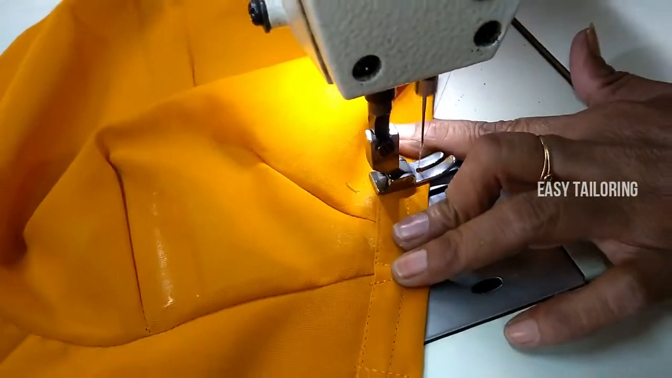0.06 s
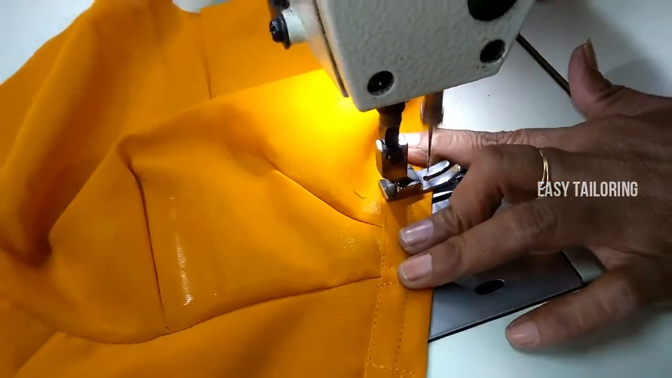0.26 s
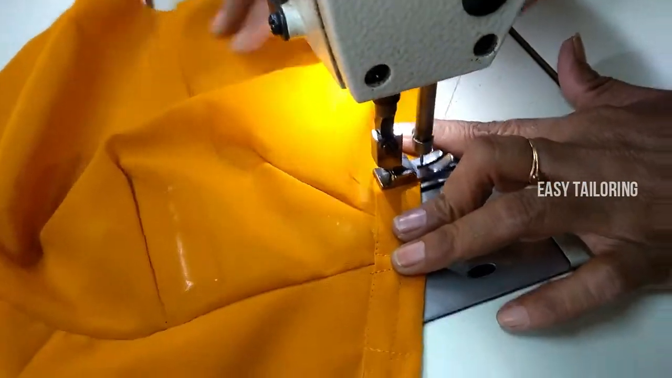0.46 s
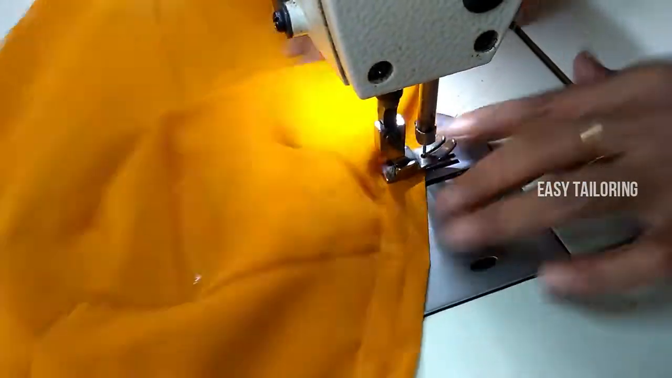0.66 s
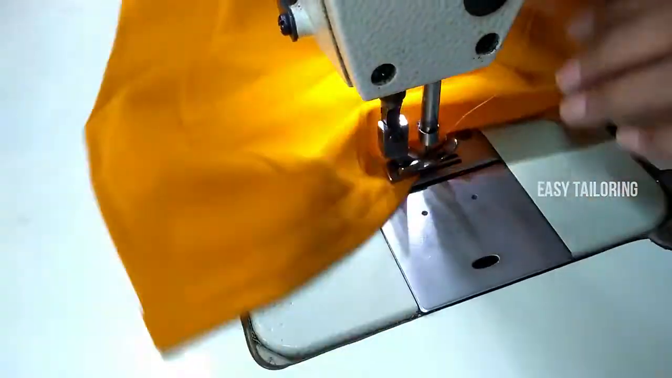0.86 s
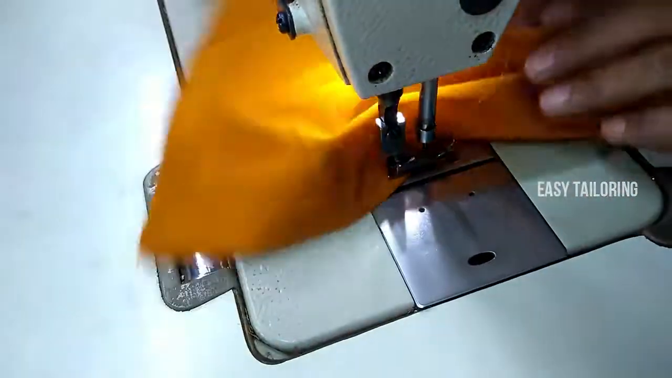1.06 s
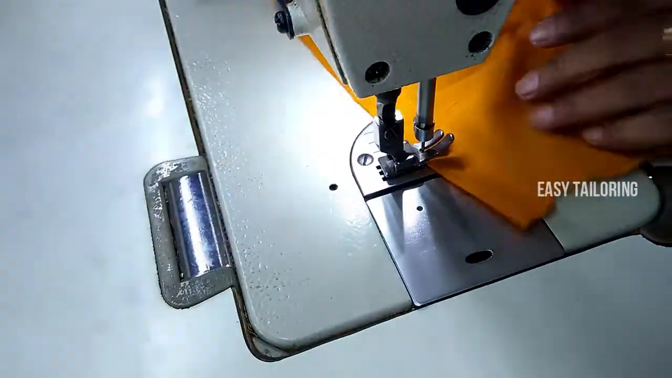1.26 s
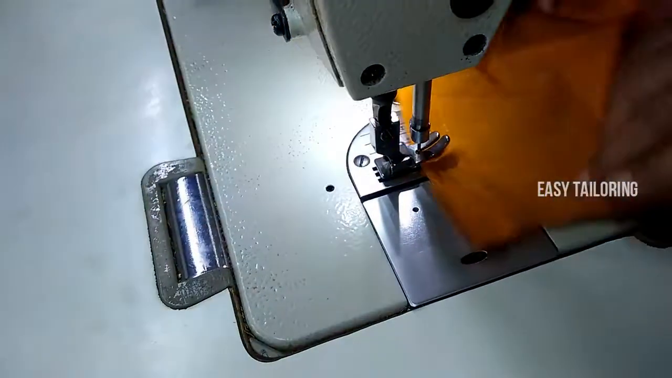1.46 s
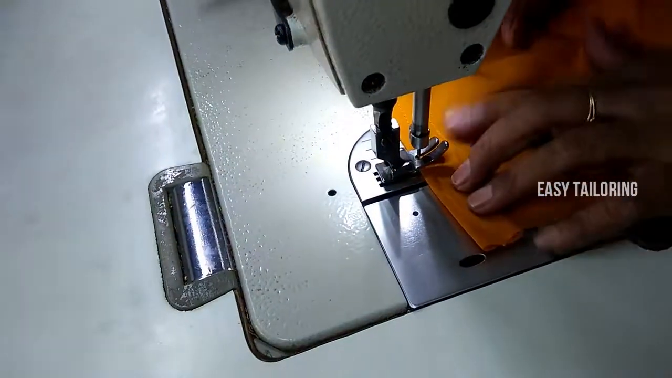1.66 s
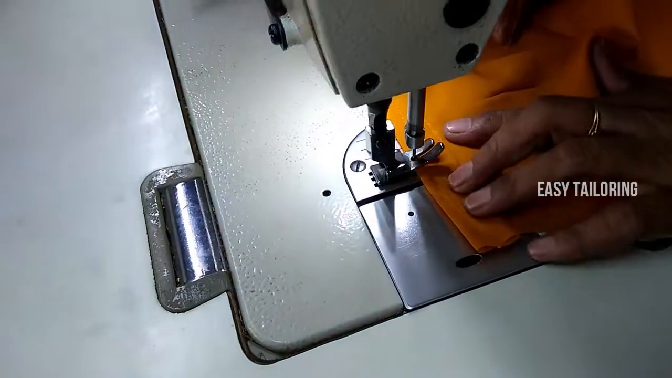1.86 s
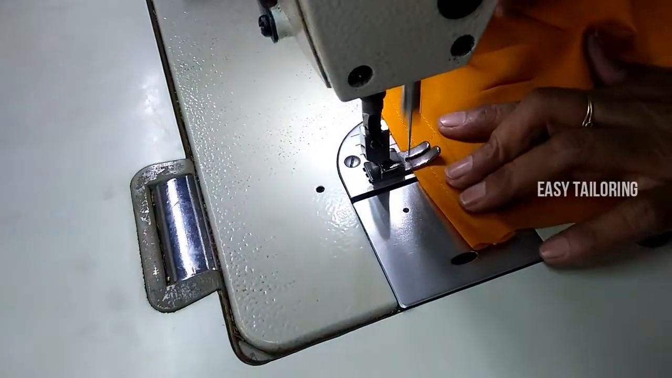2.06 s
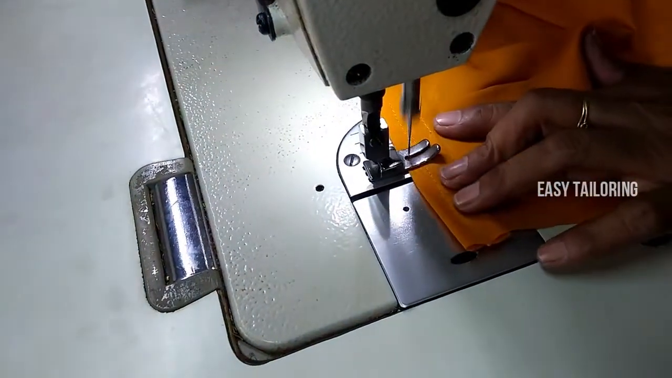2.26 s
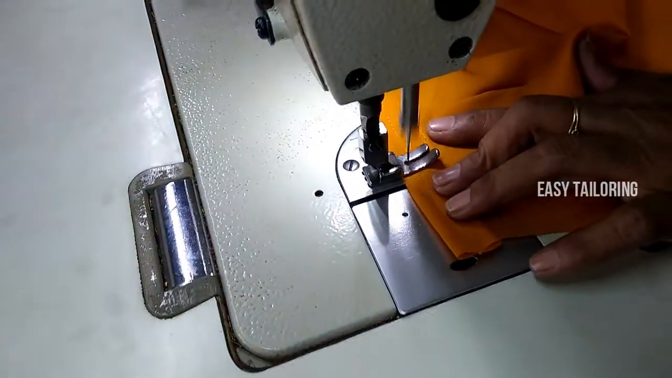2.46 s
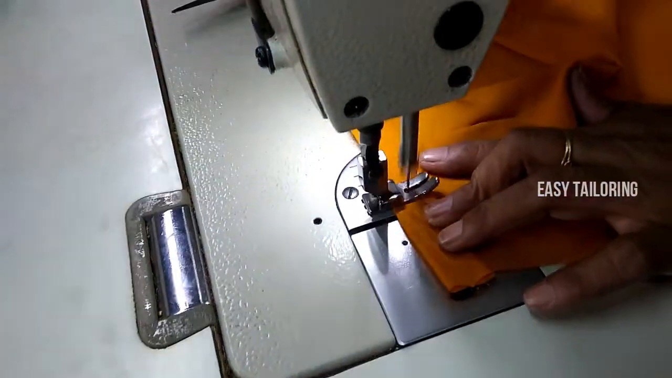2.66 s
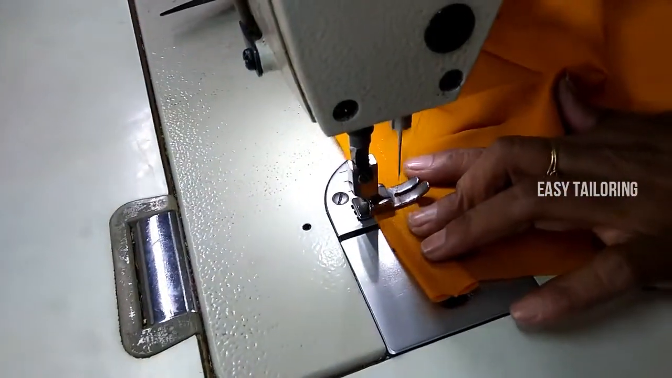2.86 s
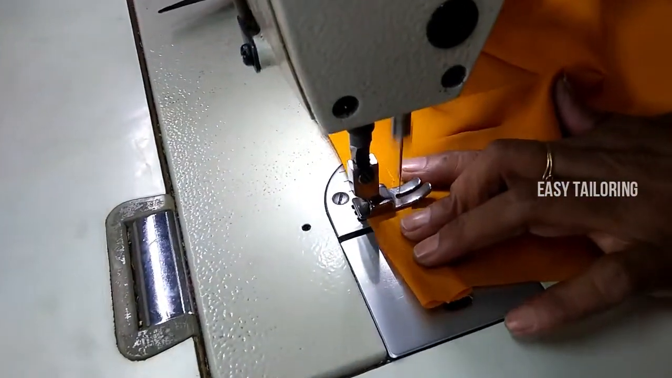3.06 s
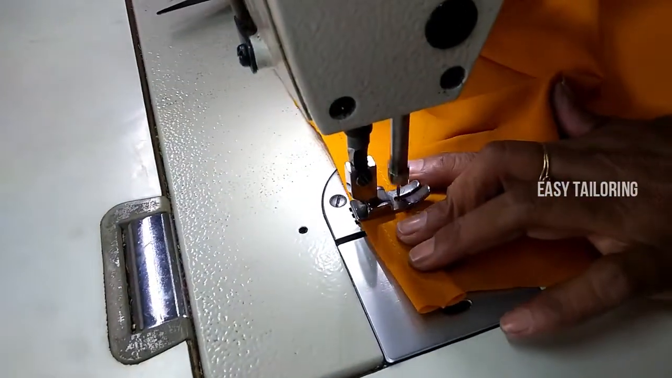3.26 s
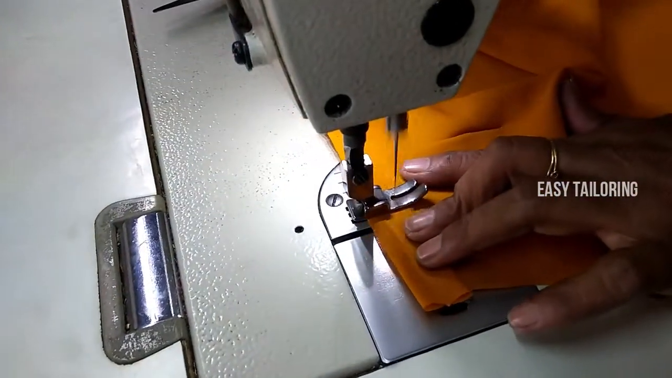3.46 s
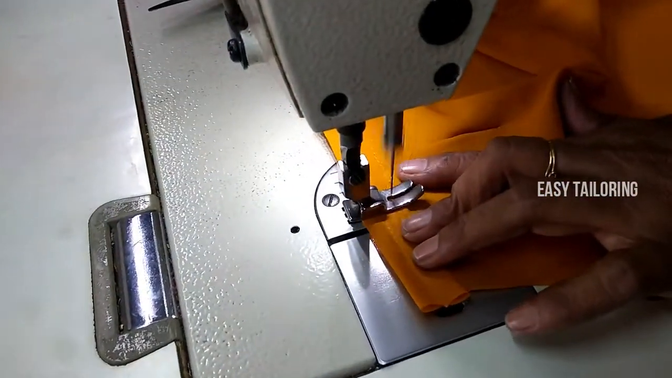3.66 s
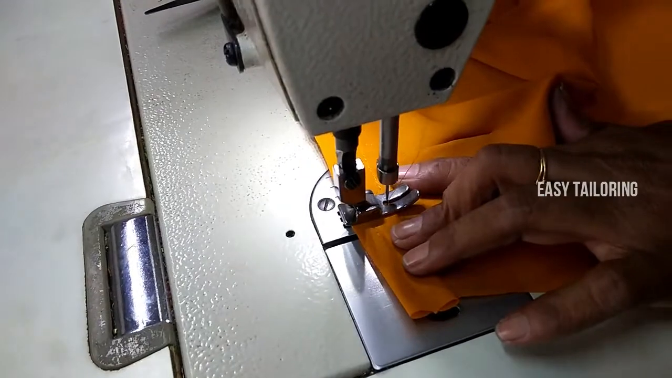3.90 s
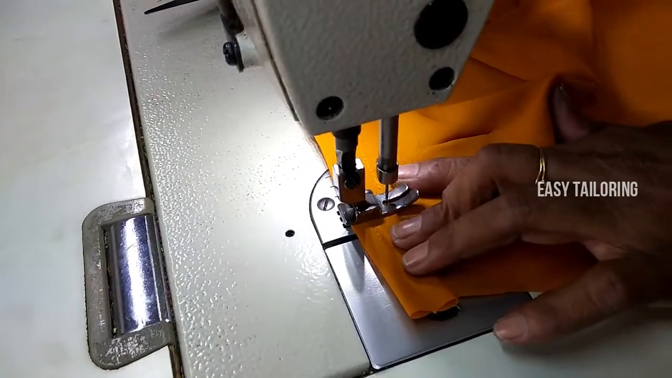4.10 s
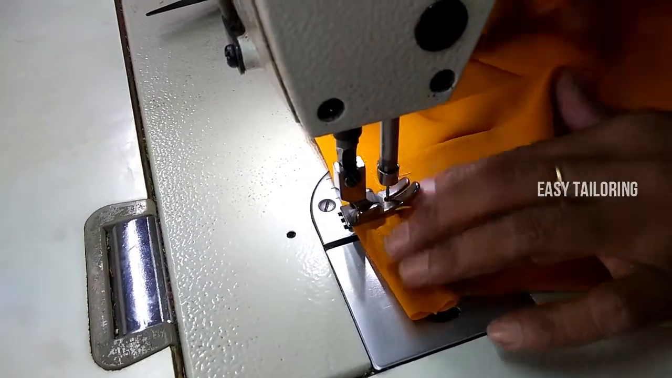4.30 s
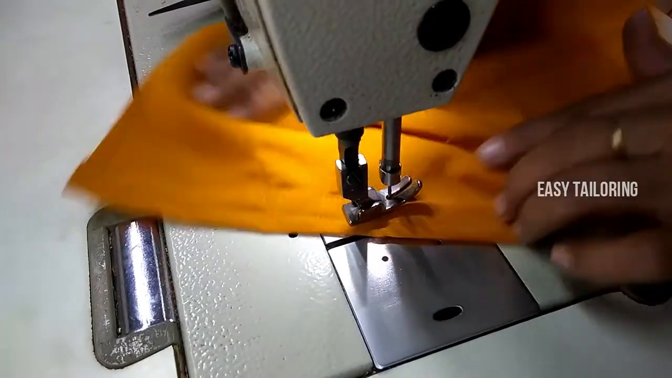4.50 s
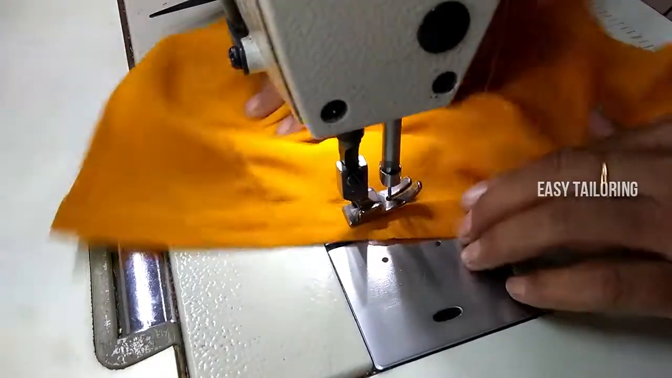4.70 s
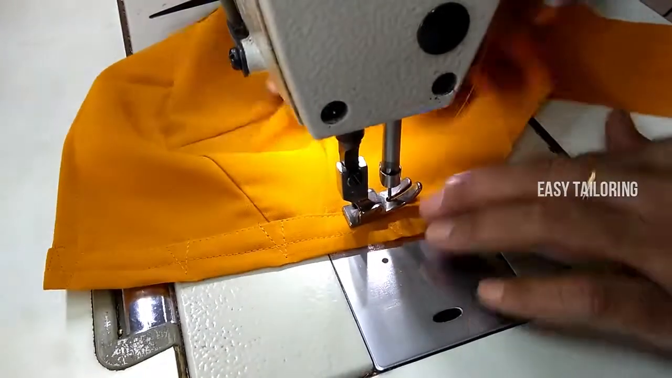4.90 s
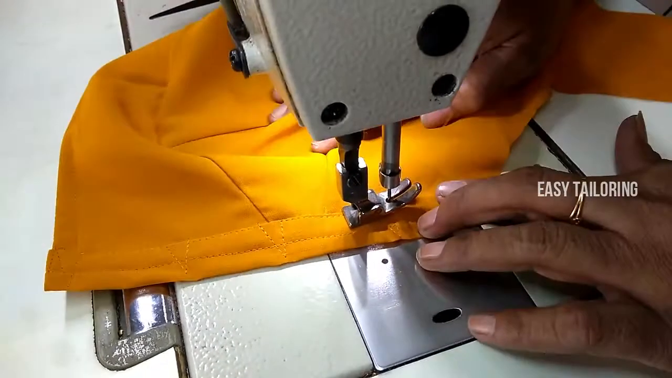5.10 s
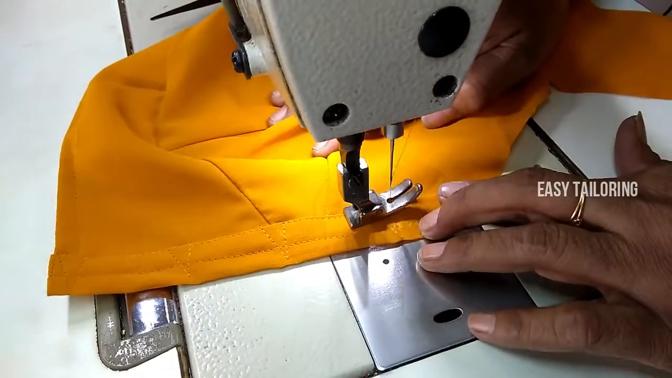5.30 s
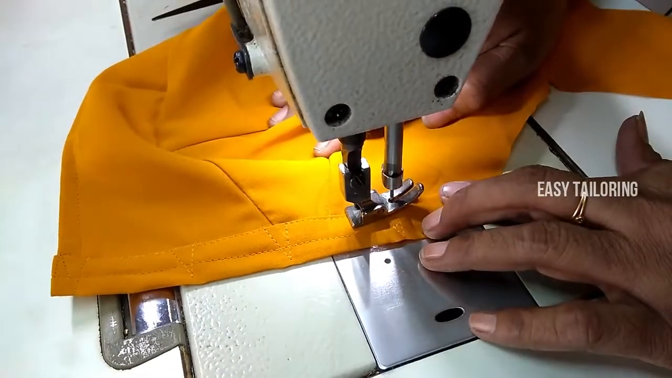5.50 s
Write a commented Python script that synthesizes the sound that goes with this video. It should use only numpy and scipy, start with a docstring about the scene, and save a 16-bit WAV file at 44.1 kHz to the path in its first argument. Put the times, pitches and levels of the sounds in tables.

```python
"""A few slow stitches of an industrial sewing machine close by, then hands turning the cloth. The presser foot is
raised and dropped, a run of eight stitches a second ends in a clatter and a clunk, and a last short burst follows.
Steel linkages rattle as streams of tiny impacts, gears whirr as narrow bands of noise, hard contacts tick, and
filtered noise makes the table boom and the cloth rub. The shaking table rocks the camera, which adds a low
rumble of opposite sign in the two channels."""
import sys
import numpy as np
from scipy import signal
from scipy.fft import rfft, irfft, next_fast_len
from scipy.io import wavfile
from scipy.ndimage import uniform_filter1d

SR = 44100
rng = np.random.default_rng(int(sys.argv[2]) if len(sys.argv) > 2 else 0)


def bounce(signal):
    """Save signal as a 16-bit WAV file at the path given by the first command-line argument."""
    frames = np.transpose(np.atleast_2d(signal))
    limited = np.clip(frames, -1, 1)
    pcm = np.round(limited * 32767).astype(np.int16)
    wavfile.write(sys.argv[1], SR, pcm)


N = 244474
TIME = np.arange(N) / SR


def amp(db):
    """Decibels to gain."""
    return 10 ** (np.asarray(db) / 20)


def evened(x):
    """Scales to rms 1."""
    return x / np.sqrt(np.mean(x ** 2))


def add(mix, s, sound):
    """Mixes a sound in at s seconds."""
    part = mix[max(round(s * SR), 0):][:len(sound)]
    part += sound[:len(part)]


def response(points, size=4096):
    """Impulse response of unit energy that starts at once and has the given colour."""
    hz, db = np.transpose(points)
    bins_hz = abs(np.fft.fftfreq(size, 1 / SR))
    log_gain = np.log(amp(np.interp(np.log(bins_hz + 1), np.log(hz), db)))
    # The Hilbert transform gives the phase that lets the energy arrive as early as possible.
    spectrum = np.exp(np.conj(signal.hilbert(log_gain)))
    taps = np.fft.ifft(spectrum).real[:size // 2]
    return taps / np.linalg.norm(taps)


def through(x, taps):
    """Filters x, keeping its length."""
    return signal.oaconvolve(x, taps)[:len(x)]


def grit(per_s=2500, spread_db=3):
    """A stream of tiny impacts of uneven size, rms 1."""
    size = amp(spread_db * np.minimum(rng.exponential(1, N), 3.5)) * rng.choice([-1, 1], N)
    return evened(size * (rng.random(N) < per_s / SR))


def unevenness(length):
    """Random drift, smoothed over a length in samples, rms 1."""
    return evened(through(grit(), np.hanning(length)))


def steadied(x, span=0.032):
    """Evens out the power of x over span seconds."""
    return x / np.sqrt(abs(uniform_filter1d(x ** 2, int(span * SR))) + 1e-9)


def swells(middles, levels_db, length):
    """Envelope of bell-shaped swells, each rising and falling for length seconds."""
    power = np.zeros(N)
    for s, db in zip(middles, levels_db):
        add(power, s - length, amp(2 * db) * np.hanning(int(2 * length * SR)) ** 2)
    return np.sqrt(power)


def whistle(hz, width_hz):
    """A narrow band of noise that follows a pitch curve, rms 1."""
    noise = [1, 1j] @ rng.standard_normal((2, N))
    blur = signal.sosfilt(signal.butter(2, width_hz, fs=SR, output="sos"), noise)
    carrier = np.exp(2j * np.pi * np.cumsum(hz) / SR)
    return evened((blur * carrier).real)


def room(x, t60=0.29, channels=2):
    """Dying echoes, different in each channel."""
    t = TIME[:SR // 2]
    tail = rng.standard_normal((channels, len(t))) * amp(-60 * t / t60)
    return np.array([through(x, side / np.linalg.norm(side)) for side in tail])


def scattered(x, size=256):
    """The same sound blurred by shifting, scrambled phases."""
    spectra = signal.stft(x, nperseg=size)[2]
    paths = uniform_filter1d(rng.standard_normal((2, *spectra.shape)), size=8)
    out = signal.istft(spectra * np.exp(1j * np.arctan2(*paths)), nperseg=size)[1]
    return x.std() * evened(np.pad(out, (size // 2, 0))[:N])


PHASE_STEP_HZ = 1150  # above this pitch the channels drift half a cycle apart with every such step


def stereo(x, wet_db, shade_db=-8, shade_hz=5800, blurred_share=0.23):
    """Stereo spread: the left is shaded from the treble and drifts in phase against the right as pitch rises."""
    size = next_fast_len(N + SR // 10, True)
    hz = np.fft.rfftfreq(size, 1 / SR)
    x = x + amp(wet_db) * room(x, channels=1)[0]
    share = np.clip(blurred_share, 0, 1) * np.clip(2 * hz / PHASE_STEP_HZ - 1, 0, 1)
    clear = np.sqrt(1 - share) * rfft(x, size)
    blurred = np.sqrt(share) * rfft(scattered(x), size)
    drift = np.exp(-1j * np.pi * np.maximum(hz / PHASE_STEP_HZ - 1, 0))
    shade = amp(shade_db / (1 + (shade_hz / (hz + 1)) ** 4))
    # The clear and blurred parts drift in opposite senses.
    left, right = shade * (clear * drift + blurred / drift), clear + blurred
    return irfft(np.array([left, right]), size)[:, :N]


def chatter(rows, colour):
    """Noisy blows that die away like a train of bounces, all with one part's colour."""
    power, t = np.zeros(N), TIME[:SR // 2]
    for s, db, decay in rows:
        envelope = amp(db) * np.exp(-t / decay) * (1 - np.exp(-t / 0.0014))
        add(power, s, envelope ** 2)
    return np.sqrt(power) * steadied(through(grit(), response(colour)))


def knocks(rows, modes, detune=0.013):
    """Each blow rings the part's natural tones, a little differently every time."""
    out, t = np.zeros(N), TIME[:SR // 4]
    for s, blow_db, _ in rows:
        ring = np.zeros(len(t))
        for hz, db, t60 in modes:
            struck_hz = hz * (1 + detune * rng.uniform(-1.4, 1))
            ring += amp(blow_db + db - 60 * t / t60) * np.sin(2 * np.pi * struck_hz * t)
        add(out, s, (1 - np.exp(-t / .003)) * ring)
    return out


# One turn of the shaft makes one stitch; levels are relative: start_s, length_s, steel_db, boom_db, rock_db
STITCHES = [(.006, 0.24, -28.5, -42, -59), (0.278, 0.31, -26, -48.5, -35.5), (2.087, 0.18, -24, -31.5, -38),
            (2.298, 0.25, -27.5, -51.5, -22), (2.513, 0.11, -24.5, -24.5, -22),
            (2.626, 0.12, -24, -27.5, -27), (2.744, 0.13, -24.5, -29.5, -29), (2.873, 0.12, -25, -33, -35),
            (2.993, 0.12, -27.5, -32.5, -39), (3.11, 0.098, -28, -33, -65), (3.222, 0.13, -26, -36, -53.5),
            (3.336, 0.14, -27, -27, -32.5), (3.465, 0.13, -24.5, -23.5, -28.5),
            (3.589, 0.1, -23.5, -24.5, -26.5), (3.712, 0.14, -31.5, -38.5, -34),
            (5.234, 0.26, -24, -70, -55), (5.448, 0.2, -40, -46.5, -53)]
LISTED_LEVEL_STITCH_S = 0.14  # stitch length at which rattle, whirr and rumble keep their listed level
SPEED_DB_PER_DOUBLING = 7.5  # rattle, whirr and rumble grow with speed
RUN_DOWN_S = .022
DRIVEN_SHARE = 0.84  # the linkages rest for the last part of each turn


def each_stitch(share, db=0):
    """Times and levels of something that happens at the same point of every turn: rows (s, dB)."""
    start, length, steel_db, _, _ = np.transpose(STITCHES)
    return np.transpose([start + share * length, steel_db + db])


def shaft_angle():
    """Turns of the shaft completed at each moment."""
    angle = np.zeros(N)
    for start, length, *_ in STITCHES:
        angle += np.clip((TIME - start) / length, 0, 1)
    return angle


def turning(levels_db):
    """Envelope that lasts for the driven part of each stitch, stronger at speed, then runs down."""
    power = np.zeros(N)
    for (start, length, *_), db in zip(STITCHES, levels_db):
        speed_db = SPEED_DB_PER_DOUBLING * np.log2(LISTED_LEVEL_STITCH_S / length)
        driven = (TIME >= start) & (TIME < start + DRIVEN_SHARE * length)
        power[driven] = amp(db + speed_db) ** 2
    keep = np.exp(-1 / (RUN_DOWN_S * SR))
    return np.sqrt(signal.lfilter([1 - keep], [1, -keep], power))


# Moving parts rattle in three sweeps in each stitch: turn_share, relative_level_db
SWEEPS = [(0.154, -1.5), (0.379, -3), (0.681, -4)]


def sweeping(length):
    """Envelope that swells as the moving parts sweep through each stitch."""
    rows = np.vstack([each_stitch(share, db) for share, db in SWEEPS])
    return swells(*rows.T, length)


# Colour of the steel parts: pitch_hz, relative_level_db_per_hz
STEEL = [(60, -19.5), (850, -21), (1400, -7.5), (2150, 3.5), (2450, 3), (3200, 1.5), (4200, 1.5),
         (5300, -4.5), (7200, -6.5), (8600, -1.5), (9700, -7), (11500, -4.5), (16200, -31.5)]
# Ringing tones of the cast head: pitch_hz, relative_level_db, t60_s (time to fall 60 dB)
HEAD_MODES = [(3047, 6.5, 0.015), (3500, -6.5, 0.017), (10800, -5.5, 0.03)]


def head(ring_db=-14):
    """Response of the steel head: a crack and the casting's natural tones."""
    t = TIME[:SR // 10]
    ring = sum(amp(db - 60 * t / t60) * np.cos(2 * np.pi * hz * t) for hz, db, t60 in HEAD_MODES)
    taps = amp(ring_db) * ring / np.linalg.norm(ring)
    add(taps, 0, response(STEEL))
    return taps / np.linalg.norm(taps)


# Colour of the table's dull boom: pitch_hz, relative_level_db_per_hz
TABLE_COLOUR = [(40, -35), (170, -11), (285, 5), (380, -17.5), (520, -25.5), (5000, -80.5)]
# Ringing tones of the table top: pitch_hz, relative_level_db, t60_s
PANEL_MODES = [(288.4, 4.5, 0.2), (398, -14.5, 0.043), (522, -13, 0.64), (743.4, -18, 0.3)]


def table_top(ring_db=-7):
    """Response of the table top: a dull boom and the board's natural tones."""
    t = TIME[:SR // 4]
    ring = sum(amp(db - 60 * t / t60) * np.sin(2 * np.pi * hz * t) for hz, db, t60 in PANEL_MODES)
    taps = amp(ring_db) * ring / np.linalg.norm(ring)
    add(taps, 0, response(TABLE_COLOUR))
    return taps


# Colour of the workshop background: pitch_hz, relative_level_db_per_hz
AIR_COLOUR = [(30, -36.5), (284, -14.5), (400, -17), (1390, -8), (1850, -16), (1980, -3), (2300, -10.5),
              (5500, -18.5), (15000, -33.5)]


def air(level_db=-68, waver_db=2):
    """Faint workshop background: coloured noise, slightly uneven."""
    waver = amp(abs(waver_db) * unevenness(SR // 10))
    noise = through(rng.standard_normal(N), response(AIR_COLOUR))
    return stereo(amp(level_db) * waver * noise, wet_db=-0.5)


# Curve of the fingers sliding on the bed: time_s, pitch_hz, relative_level_db
SLIDES = [(0.559, 3115, -50), (.72, 2750, -89), (0.768, 4440, -50), (0.851, 3500, -103), (1.3, 3025, -62.5),
          (1.702, 2600, -73)]


def fingers(width_hz=130, judder_db=3):
    """Skin and fabric slide on the bed with a thin, uneven hiss that glides in pitch."""
    s, hz, db = np.transpose(SLIDES)
    judder = judder_db * unevenness(SR // 40)
    hiss = whistle(np.interp(TIME, s, hz), width_hz)
    level_db = np.interp(TIME, s, db, left=-np.inf, right=-np.inf)
    return stereo(amp(judder + level_db) * hiss, wet_db=-20)


# Level curve of cloth dragged over the bed: time_s, relative_level_db
CLOTH_DRAG = [(.55, -53.5), (.73, -60), (.78, -54.5), (.94, -67), (1.3, -61.5), (1.75, -71), (4.3, -71),
              (5.1, -76.5)]
# Colour of fabric rubbed by the hands: pitch_hz, relative_level_db_per_hz
FABRIC = [(60, -14.5), (260, -6), (500, -8.5), (1500, -12), (12000, -22)]


def cloth(clump_db=4, hiss_db=-4):
    """Fabric rubs under the hands and hisses over the steel bed in little jerks."""
    jerks = clump_db * unevenness(SR // 30)
    drag = amp(np.interp(TIME, *np.transpose(CLOTH_DRAG), left=-np.inf) + jerks)
    rub = through(grit(), response(FABRIC))
    hiss = amp(hiss_db) * through(grit(), response(STEEL))
    return stereo(drag * (rub + hiss), wet_db=-11.0)


# Hands bump on the table as they turn the cloth: start_s, relative_level_db
BUMPS = [(.584, -42), (.634, -29), (.747, -38), (.799, -42), (.837, -41.5), (.87, -43.5), (1.237, -35.5),
         (1.332, -42.5), (1.399, -39.5), (1.475, -44.5), (1.53, -44), (4.368, -50), (4.757, -50)]
# Colour of the camera rocking on the shaken table: pitch_hz, relative_level_db_per_hz
ROCKING = [(35, -40.5), (62, -32.5), (90, 1), (125, -7), (190, -10), (1500, -75.5)]


def hands(decay=0.017, rock_db=-5):
    """Short, dull bumps on the table top that also rock the camera."""
    rows = [(s, db, decay) for s, db in BUMPS]
    rock = amp(rock_db) * chatter(rows, ROCKING)
    return stereo(chatter(rows, TABLE_COLOUR), wet_db=-6.5) + np.array([rock, -rock])


# The table ringing under the dropped foot, the clunk and the hands, and squeaks of pedal and springs:
# start_s, pitch_hz, relative_level_db, length_s, fall_octaves
RINGS = [(.3, 150.4, -44, 0.54, 0), (1.102, 520, -35.5, 0.027, 0.11), (1.911, 1010, -34.5, 0.023, 0.065),
         (2.009, 677, -31.5, 0.098, 0.82), (2.021, 299, -13, 0.056, 0), (3.904, 968, -40, 0.065, 0.08),
         (4.215, 830, -50.5, 0.11, 0.014), (5.114, 1380, -50, 0.061, 0.078)]


def rings(waver=0.038, attack_share=0.084, rasp=0.27):
    """Short rasping, wavering tones that swell fast and fade, some sinking in pitch."""
    out = np.zeros(N)
    drift = unevenness(300)
    for s, hz, db, length, fall in RINGS:
        t = TIME[:int(length * SR)]
        pitch = hz * 2 ** (-fall * t / length) * (1 + waver * drift[int(s * SR):][:len(t)])
        tone = np.sqrt(2) * np.sin(2 * np.pi * np.cumsum(pitch) / SR)
        swell = 1 - np.exp(-t / (attack_share * length))
        fade = np.cos(np.pi / 2 * t / length)
        add(out, s, amp(db) * tone * swell * fade)
    out = out * (1 + rasp * unevenness(SR // 200))
    return out + amp(-4) * room(out)


# A heavy lever hits its stop and chatters: start_s, relative_level_db, decay_s
CLUNKS = [(.259, -14, 0.014), (.281, -27, 0.043), (.315, -25, 0.043), (3.836, -16.5, 0.035)]
# The foot lifter catches and slips: start_s, relative_level_db, decay_s
LIFTS = [(1.854, -25.5, 0.012), (1.868, -32.5, 0.0023), (1.878, -24, 0.0049), (1.891, -31, 0.019),
         (1.955, -30, 0.014), (2.02, -35, 0.034)]
# Loose steel clatters as the run brakes: start_s, relative_level_db, decay_s
CLATTERS = [(3.615, -19.5, 0.025), (3.646, -22, 0.013)]
# Colours of the lever, lifter and loose steel: pitch_hz, relative_level_db_per_hz
CLUNK_COLOUR = [(35, -42.5), (110, -5), (210, -7), (350, 8.5), (480, -10.5), (860, -33.5), (1300, -9.5),
                (1900, -19), (15000, -43)]
LIFTER_COLOUR = [(50, -45.5), (290, 14), (600, -14.5), (1200, 6), (1600, -16), (1980, 7), (2700, -1.5),
                 (5400, -0.5), (7500, -14.5), (16000, -22.5)]
CLATTER_COLOUR = [(60, -8.5), (420, -1), (2100, -1), (4500, -7), (5800, -1.5), (16000, -25)]
# Ringing tones of the struck lever: pitch_hz, relative_level_db, t60_s
LEVER_MODES = [(92, -16, 0.35), (283, -8, 0.18), (350, -2.5, 0.15), (455, -16.5, 0.16), (1234, -16.5, 0.14),
               (1413, -11, 0.21)]


def levers(clunk_db=-3, ring_db=0.5, rock_db=-8, steel_db=2.5):
    """The lever's clunk, which also rocks the camera, the foot lifter's knocks and the braking clatter."""
    clunk = amp(clunk_db) * chatter(CLUNKS, CLUNK_COLOUR)
    ring = amp(ring_db) * knocks(CLUNKS, LEVER_MODES)
    steel = amp(steel_db) * (chatter(LIFTS, LIFTER_COLOUR) + chatter(CLATTERS, CLATTER_COLOUR))
    rock = amp(rock_db) * chatter(CLUNKS, ROCKING)
    return stereo(clunk + ring + steel, wet_db=-6.5) + np.array([rock, -rock])


# Shoves on the table by the foot lifter or the motor starting and stopping: middle_s, relative_level_db
THUDS = [(1.972, -31.5), (2.115, -26), (2.164, -26), (2.339, -31.5), (3.902, -31), (5.284, -38.5),
         (5.335, -34.5)]
FEED_SHARE = 0.657  # the feed shoves the table this far into the turn


def table(boom_db=0, rock_db=1, length=0.024, thud_length=0.035, thud_rock_db=-9,
          rumble_db=-11, sway_db=-8, lag_s=0.0007):
    """Shoves and the running shaft boom in the table and rock the camera, with opposite signs left and right."""
    _, _, _, booms, rocks = np.transpose(STITCHES)
    feeds = each_stitch(FEED_SHARE)[:, 0]
    thuds = swells(*np.transpose(THUDS), thud_length)
    feed_boom = amp(boom_db) * swells(feeds, booms, length)
    rumble = amp(rumble_db) * turning(booms)
    feed_rock = amp(rock_db) * swells(feeds, rocks, length)
    sway = amp(sway_db) * turning(rocks)
    # The envelopes add as powers.
    boom = np.linalg.norm([feed_boom, rumble, thuds], axis=0)
    rock = np.linalg.norm([feed_rock, sway, amp(thud_rock_db) * thuds], axis=0)
    boom = boom * steadied(through(grit(), table_top()))
    rock = rock * steadied(through(grit(), response(ROCKING)))
    late_rock = np.interp(TIME - lag_s, TIME, rock)  # the shaking comes a little later on the right
    return np.array([boom + rock, boom - late_rock]) + amp(-1.5) * room(boom)


# Whirr of the gears: pitch_hz, relative_level_db, pitch_swing_share
WHIRRS = [(1058, -18.5, 0.02), (1456, -0.5, 0.083), (1758, -9, 0.036)]


def gears(level_db=-21, sweep_db=-15, load_db=3, load_share=0.13):
    """Whirrs whose pitch and strength swing with the load, twice in each stitch, and that swell in each sweep."""
    load = 4 * np.pi * (shaft_angle() - load_share)
    whirr = np.zeros(N)
    for hz, db, swing in WHIRRS:
        whirr += amp(db) * whistle(hz * (1 - swing * np.sin(load)), width_hz=70)
    steady = amp(level_db + load_db * np.cos(load)) * turning(np.transpose(STITCHES)[2])
    level = np.hypot(steady, amp(sweep_db) * sweeping(length=.022))
    return stereo(level * whirr, wet_db=-6)


# The hardest knocks of steel on steel: start_s, relative_level_db
TICKS = [(0.0877, -17.5), (0.1037, -14), (0.166, -19.5), (0.3334, -17), (0.3684, -18), (0.3804, -16),
         (0.473, -16), (0.49, -16), (0.556, -39), (0.807, -33.5), (2.152, -12), (2.1934, -17),
         (2.3442, -19), (2.4368, -18.5), (2.4559, -19.5), (2.5671, -13), (2.591, -16), (2.6714, -11),
         (2.715, -17), (2.802, -12.5), (2.8252, -17), (2.885, -18), (2.922, -12.5), (2.954, -17),
         (3.0713, -22.5), (3.1831, -17.5), (3.2692, -13.5), (3.293, -10), (3.3656, -18.5), (3.4206, -20.5),
         (3.487, -16), (3.615, -13.5), (3.6546, -13.5), (3.7431, -18), (3.807, -20), (3.8637, -13),
         (5.236, -30), (5.2642, -17), (5.3617, -15.5), (5.3955, -14.5)]


def ticks(level_db=13.0, contact=0.0014, buzz_db=7, rattle_db=1, rattle_decay=0.0049, hardness=0.66):
    """Hard contacts on the head: a bright snap, a brief buzz of bounces and a dying rattle, new each time."""
    blows, t = np.zeros(N), TIME[:SR // 20]
    for s, db in TICKS:
        buzz, rattle = rng.standard_normal((2, len(t))) * np.exp(-t / [[contact], [rattle_decay]])
        snap = t == 0  # a single-sample click
        blow = snap + amp(buzz_db) * buzz / np.linalg.norm(buzz)
        blow += amp(rattle_db) * rattle / np.linalg.norm(rattle)
        add(blows, s, amp(db + level_db) * through(blow, [1, -hardness]))  # harder is brighter
    return stereo(through(blows, head()), wet_db=-14.5)


def linkages(stroke_db=-0.5, bearing_db=-11, sweep_length=0.029, judder_db=3):
    """Play in the joints: a dense, fine rattle while the shaft turns, stronger during each sweep."""
    bearings = amp(bearing_db) * turning(np.transpose(STITCHES)[2])
    level = np.hypot(bearings, amp(stroke_db) * sweeping(sweep_length))
    judder = amp(judder_db * unevenness(SR // 200))
    rattle = steadied(judder * grit(per_s=14000))
    return stereo(through(level * rattle, head()), wet_db=-25)


def scene():
    """The workshop, the cloth, the hands and the machine."""
    handling = air() + fingers() + cloth() + hands()
    machine = rings() + levers() + table() + gears() + ticks() + linkages()
    return handling + machine


def record(dry):
    """The recorder's band limit: a steep cut of the highest treble."""
    low_pass = signal.firwin(255, 16400, window=("kaiser", 9), fs=SR)  # edge in Hz
    return signal.oaconvolve(dry, low_pass[None], "same")


dry = scene()
out = record(dry)
bounce(out)
```